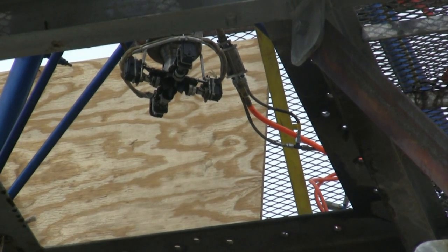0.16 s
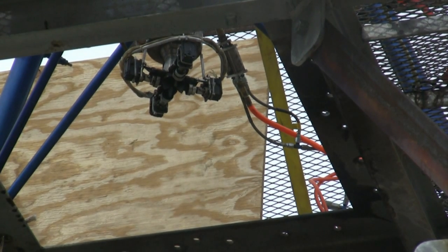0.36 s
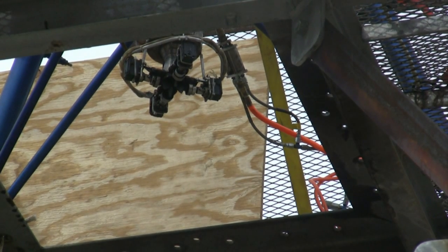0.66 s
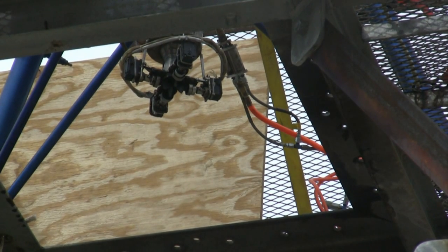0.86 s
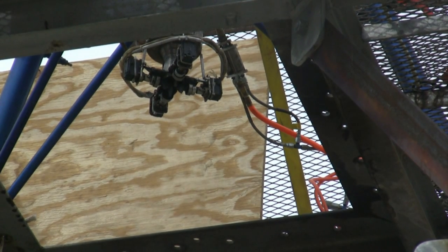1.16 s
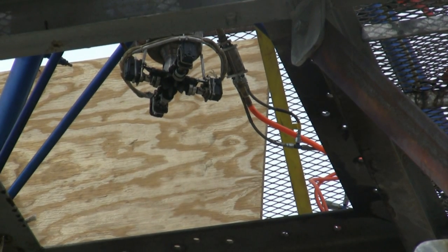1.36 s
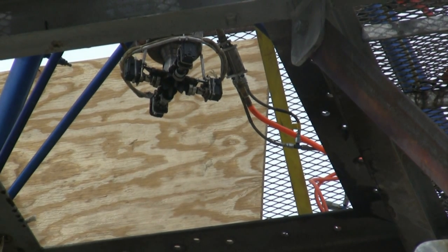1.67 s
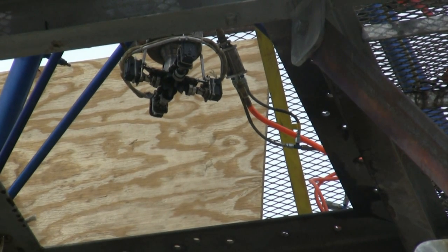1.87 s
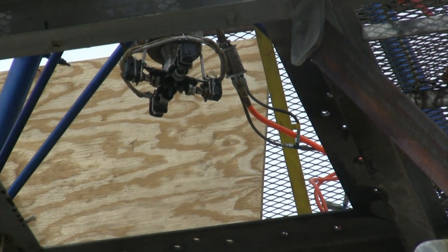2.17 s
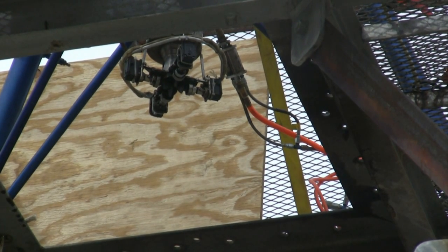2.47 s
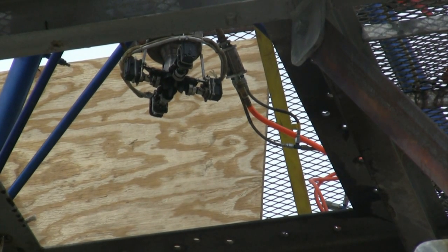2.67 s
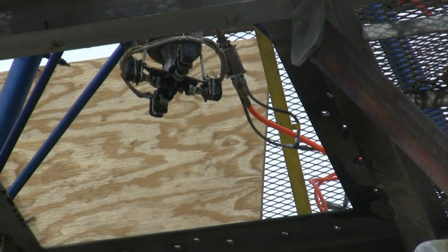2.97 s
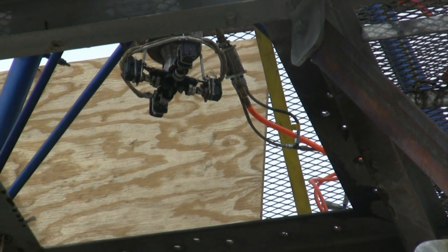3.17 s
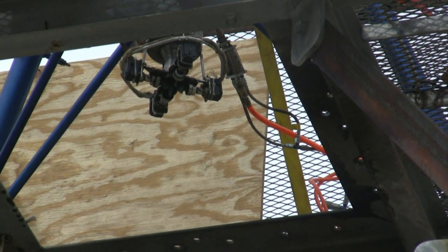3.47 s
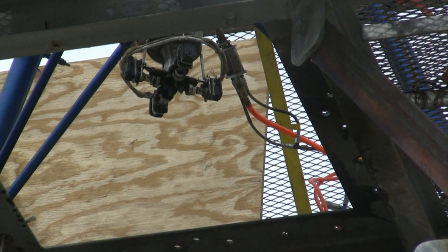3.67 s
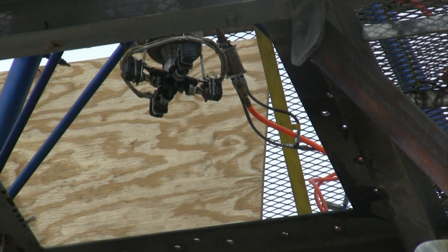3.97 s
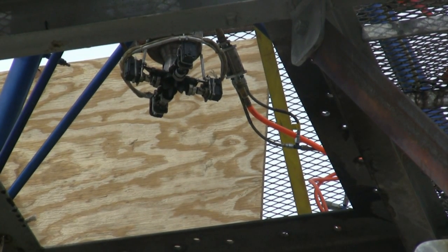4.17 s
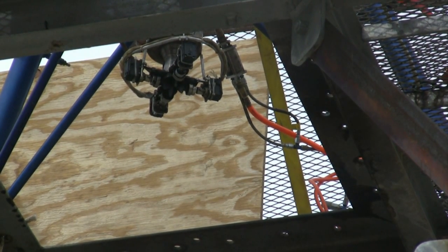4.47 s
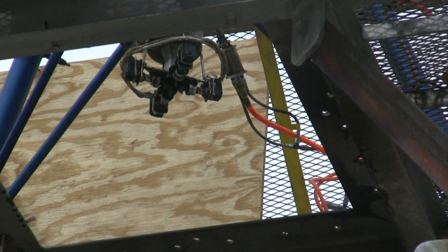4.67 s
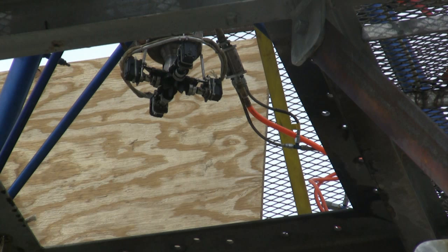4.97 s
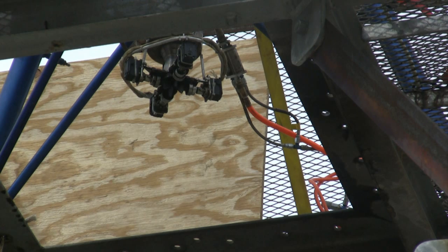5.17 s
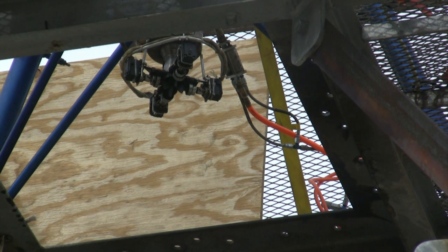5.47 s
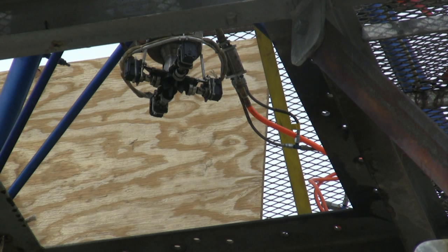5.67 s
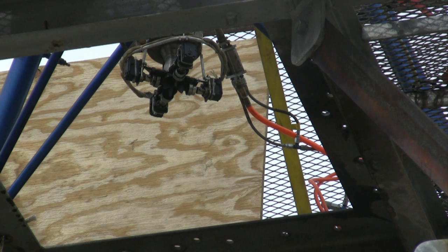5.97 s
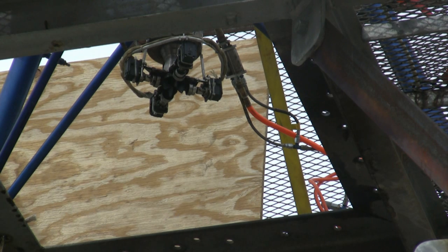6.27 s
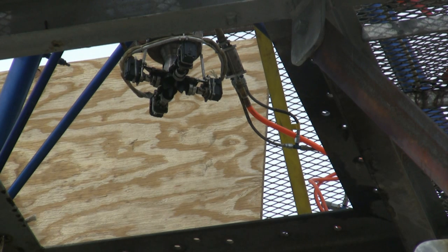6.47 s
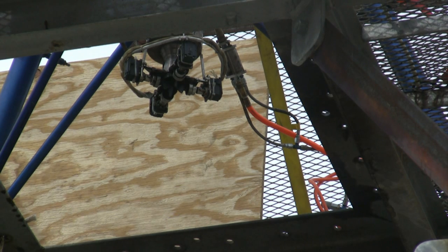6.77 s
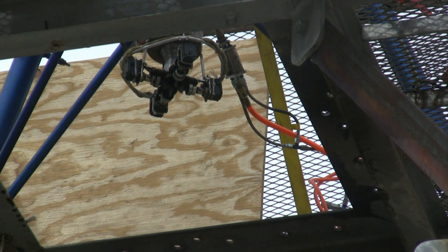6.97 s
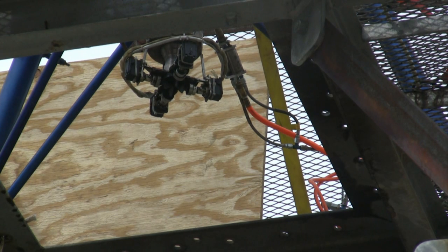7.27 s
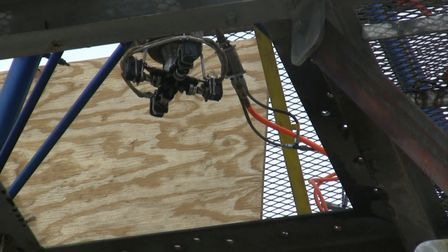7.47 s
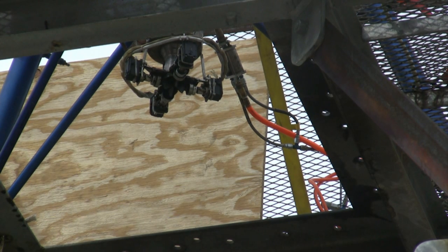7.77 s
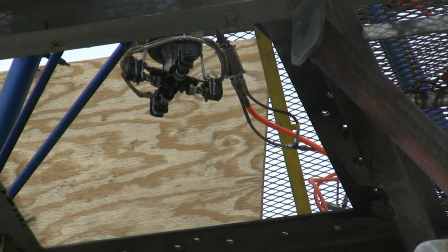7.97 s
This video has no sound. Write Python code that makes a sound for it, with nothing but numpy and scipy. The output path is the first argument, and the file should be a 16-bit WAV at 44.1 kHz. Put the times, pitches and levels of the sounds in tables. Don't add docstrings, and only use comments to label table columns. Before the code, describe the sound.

Close to a small thruster on a steel and plywood stand, a loud broadband exhaust roar overloads the microphone with buffeting wind. It sputters, weakens and shuts off into a brief leaking hiss. In the pause, faint yard noise, hum and wind bumps rise, with a tiny tick. Then a hard pressure thump restarts the jet, with a falling resonant tone and a climbing whistle.

```python
import sys
import numpy as np
from scipy import signal
from scipy.fft import rfft, irfft, next_fast_len
from scipy.io import wavfile
from scipy.ndimage import uniform_filter1d, map_coordinates

SR = 44100
rng = np.random.default_rng(int(sys.argv[2]) if len(sys.argv) > 2 else 0)


def undo_db(level):
    steps = np.asarray(level, float) / 20
    return 10 ** steps


def unload_wav(signal):
    wavfile.write(
        sys.argv[1],
        SR,
        np.round(np.clip(np.atleast_2d(signal).T, -1, 1) * 32767).astype(np.int16),
    )


N = 357648
TIME = np.arange(N) / SR

# start in seconds, end in seconds.
PHASES_S = [
    (0, 2.38),
    (2.38, 3.3),
    (3.3, 5.79),
]
SHUT_S = PHASES_S[-1][1]
# start in seconds, end in seconds, first level in dB.
OPENING = (7.1225, 7.1268, -36)
# time in seconds, level in dB.
PRESSURE = [(0, 0.5), (1.1, 0), (2.25, -.5), (2.5, 1.5), (3.0, 0), (3.5, 0), (4.2, -1.5), (4.9, -5),
            (5.1, -6.5), (5.43, -9), (5.69, -11.5), (5.735, -13), (5.77, -31), (5.79, -37.5), (7.12, 0),
            (7.5, -0.5), (7.75, -0.5), (8.11, -1)]
CHOKE_S = (7.31, 7.7)
RECOVER_DB_PER_S, RECOVERED_S = 21, 6.82
DRIFT_GONE_S = (6.82, 6.9)


def unit(x):
    return x / np.sqrt(np.mean(x ** 2) + 1e-20)


def along(points, hz):
    f, v = np.transpose(points)
    return np.interp(np.log(hz + 1), np.log(f + 1), v)


def colour(points):
    return lambda hz: undo_db(along(points, hz))


def curves(rows):
    s, *cols = np.transpose(rows)
    return np.array([np.interp(TIME, s, c) for c in cols])


def ramp(start, end):
    return np.interp(TIME, [start, end], [0, 1])


def wobble(rate):
    knots = rng.standard_normal(int(N * rate / SR) + 4)
    return map_coordinates(knots, [np.arange(N) * rate / SR])


def swells(rows):
    t = np.arange(0, N + 64, 64) / SR
    total = sum(db * np.exp(-((t - s) / w) ** 2 / 2) for s, db, w in rows)
    return np.interp(TIME, t, total)


def filtered(x, response):
    m = next_fast_len(x.shape[-1] + 8192)
    return irfft(rfft(x, m) * response(np.fft.rfftfreq(m, 1 / SR)), m)[..., :x.shape[-1]]


def ports(hz, aside, spread):
    # frequency in Hz, difference in dB.
    left_db = [(60, -14), (300, -10.5), (1300, -6), (2400, -6), (4400, -4.5), (6300, -3), (7600, -8),
               (8600, -1.5), (9600, -3.5), (10500, 3.5), (12500, 0.5), (15500, -2.5)]
    # frequency in Hz, lead in radians.
    left_lead = [(30, .15), (3200, .3), (5500, .15), (7000, .1), (7900, 1.8), (8600, 1.9), (9600, 1.15),
                 (10800, .95), (12700, .5), (15300, 0)]
    # frequency in Hz, likeness from 0 to 1.
    alike = [(60, .5), (200, .96), (1400, .95), (3100, .95), (4500, .96), (6500, .82), (7600, .25),
             (8600, .62), (9600, .82), (13000, .76), (14300, .8), (15300, .9)]
    turn = np.arccos(np.clip(along(alike, hz), 0, 1) ** spread) / 2
    lean = undo_db(aside * along(left_db, hz) / 2) * np.exp(.5j * along(left_lead, hz))
    left = [lean * np.cos(turn), lean * np.sin(turn)]
    right = [np.cos(turn) / lean, -np.sin(turn) / lean]
    return np.array([left, right])


def rush(response, aside=1, spread=1, span=(0, N / SR)):
    first, last = round(span[0] * SR), min(round(span[1] * SR), N)
    noise = rng.standard_normal((1, 2, last - first))
    pair = filtered(noise, lambda hz: ports(hz, aside, spread) * response(hz)).sum(axis=1)
    pair = pair / np.sqrt(np.mean(pair.mean(axis=0) ** 2))
    return np.pad(pair, ((0, 0), (first, N - last)))


def glide(hz, knots, core=0):
    envelope = core + wobble(knots) + 1j * wobble(knots)
    return np.real(envelope * np.exp(2j * np.pi * np.cumsum(hz) / SR))


def puff(s, hz, width):
    return np.sin(2 * np.pi * hz * (TIME - s)) * np.exp(-((TIME - s) / width) ** 2 / 2)


def background_db():
    open_db, climb_share = [-45.5, -52.5, -45.5, -30], [.75, .4, .9, 1]
    linger_db, linger_end_s, linger_decay_s = [6.5, 14.5, 1.5, 0], 6.07, .07
    swell_s, swell_db = (6.3, 6.55), 11
    duck_db = -17.5
    gain_db = RECOVER_DB_PER_S * np.minimum(TIME - RECOVERED_S, 0) + duck_db * (TIME > OPENING[1])
    levels = np.array(open_db)[:, None] + np.outer(climb_share, gain_db)
    linger = np.outer(linger_db, np.exp(-np.maximum(TIME - linger_end_s, 0) / linger_decay_s))
    return levels + linger + np.outer([0, swell_db, 0, 0], ramp(*swell_s) - 1)


def yard_noise(level_db):
    # frequency in Hz, density in dB per Hz.
    yard_colour = [(60, -28), (130, -4), (250, -7), (380, -2), (460, -6), (550, -1.5), (650, -11),
                   (760, -5), (950, -12), (1150, -7), (1650, -12), (1850, -22), (2600, -27.5), (4000, -61)]
    lull_db = -2 * ramp(*DRIFT_GONE_S)
    return undo_db(level_db + lull_db + 1.6 * wobble(3.7)) * rush(colour(yard_colour), span=(5.3, 7.3))


def far_hiss(level_db):
    # frequency in Hz, density in dB per Hz.
    hiss_colour = [(1180, -40.5), (2000, -14), (2570, -14), (3290, -12.5), (3680, -15), (4370, -5.5),
                   (5470, -4.5), (5960, -7.5), (6380, -5), (6660, -9), (15600, -15)]
    own = unit(filtered(rng.standard_normal((2, N)), colour(hiss_colour)))
    return undo_db(level_db) * (0.86 * rush(colour(hiss_colour), span=(5.3, 7.3)) + 0.71 * own)


def breeze(level_db):
    # frequency in Hz, density in dB per Hz.
    breeze_colour = [(15, -10), (30, -1.5), (90, -3.5), (200, -14), (400, -39.5)]
    noise = unit(filtered(rng.standard_normal((2, N)), colour(breeze_colour)))
    return undo_db(level_db + 3 * wobble(15)) * noise * undo_db([[-6], [0]])


def hum(level_db):
    # frequency in Hz, level in dB.
    mains = [(59.6, -6), (119.2, -17), (178.8, -29), (548, -25), (755, -29), (870, -29)]
    tones = 0
    for hz, db in mains:
        phase = 2 * np.pi * hz * TIME + 0.44 * wobble(9) + hz / 800 * wobble(35)
        tones = tones + undo_db(db + 1.8 * wobble(14)) * np.sin(phase)
    return undo_db(level_db + 1.5 + [[-5], [3]]) * tones


def background():
    yard_db, hiss_db, breeze_db, hum_db = background_db()
    return yard_noise(yard_db) + far_hiss(hiss_db) + breeze(breeze_db) + hum(hum_db)


def bumps():
    # time in seconds, right port level in dB, frequency in Hz, width in seconds.
    wind_bumps = [(2.33, -14, 69.7, 0.011), (2.77, -12, 130, .008), (6.132, -23, 140, 0.0056),
                  (6.185, -39, 110, .006), (6.266, -22, 110, 0.0037), (6.28, -25, 75, 0.0059),
                  (6.293, -30, 99.5, .006), (6.345, -33, 120, .005), (6.38, -31, 110, .005),
                  (6.41, -36, 100, .006), (6.528, -35, 129, .006), (6.985, -5, 110, 0.0038),
                  (6.999, -15, 100, .004), (7.03, -24, 60, .01)]
    return sum(undo_db(db) * puff(s, hz, w) for s, db, hz, w in wind_bumps) * np.array([[-.5], [1]])


def drift():
    # frequency in Hz, density in dB per Hz.
    drift_colour = [(1500, -30), (1900, -0.5), (2600, -2.5), (3300, -2.5), (4000, -6), (5500, -20)]
    # time in seconds, lift in dB, width in seconds.
    last_puff = [(6.09, 8, .035)]
    climb_db = RECOVER_DB_PER_S * np.minimum(TIME - RECOVERED_S, 0)
    level_db = -57.5 + swells(last_puff) + .3 * climb_db - 9 * ramp(*DRIFT_GONE_S)
    return undo_db(level_db) * rush(colour(drift_colour), spread=2.5, span=(5.8, 7.1))


def leak():
    # time in seconds, level in dB.
    leak_db = [
        (5.76, -39),
        (5.776, -38),
        (5.924, -33.5),
        (6.044, -31),
        (6.058, -34.5),
        (6.086, -72.5),
        (6.14, -66.5),
    ]
    # frequency in Hz, density in dB per Hz.
    leak_colour = [(700, -46), (1200, -18), (1600, -7), (2700, -17), (3100, -10), (4200, -5.5),
                   (5000, -8.5), (5900, -24), (7000, -15.5), (10600, -2.5), (12800, -7), (14100, -2),
                   (14800, -7), (15700, -16.5)]

    def response(hz):
        comb = 1 + 0.5 * np.exp(-2j * np.pi * hz * 0.0057) + 0.31 * np.exp(-2j * np.pi * hz * 0.0023)
        return undo_db(along(leak_colour, hz)) * comb

    return undo_db(curves(leak_db)) * rush(response, span=(leak_db[0][0], leak_db[-1][0]))


def relay_tick():
    s, db = (6.838, -35)
    tick = undo_db(db - 60 * np.abs(TIME - s) / .006) * rng.standard_normal(N)
    return tick * undo_db([[-5], [0]])


def opening_push():
    s, db, hz, width = (7.127, 2.2, 270, 0.0013)
    return undo_db(db) * puff(s, hz, width) * undo_db([[-4], [0]])


def feed_line():
    # time in seconds, resonance in Hz, level in dB.
    filling = [
        (7.14, 1650, -27),
        (7.25, 1260, -28),
        (7.33, 1000, -22.5),
        (7.43, 850, -24.5),
        (7.48, 780, -40),
    ]
    hz, db = curves(filling)
    during = (TIME > filling[0][0]) * (TIME < filling[-1][0])
    return during * undo_db(db) * glide(hz, 350)


def screech():
    # time in seconds, frequency in Hz, level in dB.
    shock_cells = [
        (7.35, 2950, -38),
        (7.5, 3100, -27),
        (7.75, 3420, -24),
        (7.95, 3570, -22),
        (8.11, 3660, -19),
    ]
    hz, db = curves(shock_cells)
    whistle = undo_db(db) * glide(hz, 70, core=.7)
    shoulder = undo_db(-21.5) * ramp(*CHOKE_S) * glide(hz + 445, 800)
    return (TIME > shock_cells[0][0]) * (whistle + shoulder)


def blast():
    # frequency in Hz, density in dB per Hz.
    gust = [(30, -21.5), (120, -5), (300, -0.5), (1200, 0), (3000, -4.5), (6000, -19.5)]
    full_db, aside_db, again_db = -7.5, -16, -24.5
    turn_s = (2.3, 2.42)
    sag_db = 4 * np.maximum(TIME - turn_s[1], 0)
    first_db = full_db + (aside_db - full_db) * ramp(*turn_s) - sag_db + 1.3 * curves(PRESSURE)[0]
    second_db = again_db + 4.5 * (TIME - OPENING[1])
    level_db = np.where(TIME > OPENING[1], second_db, np.where(TIME < SHUT_S, first_db, -120))
    noise = filtered(rng.standard_normal((2, N)), colour(gust))
    lumps = undo_db(2.4 * np.array([wobble(20), wobble(20)]))
    return undo_db(level_db) * unit(lumps * noise)


def spurts():
    # start in seconds, strength in dB, length in seconds.
    thin_gas = [(.25, 2.5, 0.28), (0.558, 3, 0.27), (.96, 1, .14), (1.35, 2, .6), (2.198, 3, .11),
                (2.39, 2.5, 0.12), (2.698, 4, .32), (3.15, 3.5, .075), (3.28, 2.5, 0.13), (3.401, 5, .075),
                (3.552, 5, 0.049), (3.675, 5.5, .095), (3.82, 3, .055), (3.94, 1.5, .18),
                (7.233, 3.5, 0.11)]
    edge_s = .012
    t = np.arange(0, N + 64, 64) / SR
    held = 0
    for s, db, length in thin_gas:
        held = held + db * (np.tanh((t - s) / edge_s) - np.tanh((t - s - length) / edge_s)) / 2
    return np.interp(TIME, t, held)


def flow():
    # rumble, roar, shriek and fizz in dB.
    bands_db = [
        (-19, -8.5, -7, -12),
        (-19.5, -7, -8, -14.5),
        (-21.5, -9.5, -9, -15),
        (-29, -12.5, -9, -13),
    ]
    follows = [.8, .95, .97, 1.15]
    spurt_share = [
        (-.6, -.3, -0.088, 1),
        (0.21, -.4, -.1, 0.88),
        (.6, 0.29, .15, 1),
        (-.3, .9, -.3, 0.94),
    ]
    # time in seconds, strength in dB, width in seconds.
    slugs = [(.03, 3, .03), (.66, 0, .08), (.87, -2, .05), (1.15, 4, .12), (2.1, 4, .15), (2.29, 5.5, .04),
             (2.68, 0, .04), (3.9, 3.5, .04), (4.8, 3, .2), (5.1, 2, .05), (5.27, 2.5, .06), (5.69, 2, .03),
             (7.416, 6, .04), (7.87, 10.5, .09)]
    slug_share = [0.92, -0.04, 0.057, -.1]
    surge_db, surge_decay_s = [21, 6.3, 7, 8], [.012, 0.015, .012, .015]
    choke_db = [-6.5, -5.5, 3, 0]

    def col(values):
        return np.array(values)[:, None]

    since = TIME - OPENING[1]
    surge = (since > -.1) * col(surge_db) * np.exp(-np.maximum(since, 0) / col(surge_decay_s))
    common = col(follows) * curves(PRESSURE) + col(slug_share) * swells(slugs)
    common = common + surge + col(choke_db) * ramp(*CHOKE_S)
    lift = spurts()
    return [common + col(base) + col(share) * lift for base, share in zip(bands_db, spurt_share)]


def jet(levels, jet_colour, panels, panel_hz, aside, spread, ring, span):
    edges_hz = [800, 3400, 8800]
    # frequency in Hz, width in Hz, level in dB.
    modes = [(334, 88, -7), (657, 130, -3), (1100, 110, -1), (1470, 260, 0), (2140, 170, -1),
             (2490, 64, -1), (3510, 71, -2), (4240, 120, 0)]

    def above(hz, edge):
        return 1 / (1 + (edge / (hz + 1)) ** 14)

    def comb(hz):
        echoes = sum(gain * np.exp(-2j * np.pi * hz * ms / 1000) for ms, gain in panels)
        return 1 + (1 - above(hz, panel_hz)) * echoes

    def stand(hz):
        return 1 + ring * sum(undo_db(db / 2) * 1j * hz * w / (c * c - hz * hz + 1j * hz * w) for c, w, db in modes)

    edges, sound = [1, *edges_hz, SR], 0
    for low, high, db in zip(edges[:-1], edges[1:], levels):
        def band(hz):
            window = np.sqrt(above(hz, low) - above(hz, high))
            return window * undo_db(along(jet_colour, hz)) * comb(hz) * stand(hz)

        sound = sound + undo_db(db + .5 * wobble(14)) * rush(band, aside, spread, span)
    return sound


def patchy(x, depth_db):
    z = signal.stft(x, nperseg=512)[2]
    field = rng.standard_normal(z.shape[1:])
    field = uniform_filter1d(uniform_filter1d(field, 7, 0), 16, 1)
    return signal.istft(z * undo_db(depth_db * unit(field)), nperseg=512)[1][:, :N]


def burns():
    # frequency in Hz, density in dB per Hz.
    colours = [
        [(18, -42.5), (30, -16), (380, -3.5), (948, -3), (1140, -1), (2080, 0), (3900, 1.5), (4930, 0),
         (7900, -6), (14400, -11), (15600, -11.5)],
        [(18, -48), (30, -20), (197, -10.5), (300, -8), (548, -10), (641, -4), (877, -3.5), (1480, -0.5),
         (3080, -4), (4560, -2.5), (8320, -10.5), (11400, -10.5), (15600, -15.5)],
        [(30, -28.5), (200, -14), (340, -5.5), (570, -9.5), (625, -0.5), (720, -4), (870, -5), (1080, -1.5),
         (1970, -4), (3000, -2.5), (4500, 0.5), (8000, -14), (9800, -17), (15700, -21.5)],
        [(30, -33), (290, -18.5), (900, -14.5), (2300, -14), (3300, -9.5), (3800, -4), (4400, 2), (5600, -2),
         (6500, -3.5), (7200, -10.5), (8600, -14), (11000, -14.5), (15700, -19.5)],
    ]
    # delay in ms, gain.
    panels = [
        [(2.75, 0.054), (3.2, 0.031)],
        [(2.83, .15), (3.3, 0.054), (5.6, .06)],
        [(2.86, 0.24), (3.31, 0.091), (1.2, 0.033), (4.1, 0.09), (5.7, 0.03)],
        [(3.23, 0.24), (3.8, 0.13), (4.5, 0.16), (1.4, 0.043)],
    ]
    panel_hz = [6000, 4500, 5800, 7010]
    aside = [.3, .6, 1.05, .6]
    spread = [3, 1.8, 1.25, 1.3]
    stand_ring = [0.042, .15, .25, .05]
    start, end, first_db = OPENING
    spans = PHASES_S + [(start - .02, N / SR)]
    phases = zip(flow(), colours, panels, panel_hz, aside, spread, stand_ring, spans)
    sound = sum(jet(*phase) for phase in phases)
    gate_s = [SHUT_S, SHUT_S + .01, start - .001, start, end]
    gate_db = np.interp(TIME, gate_s, [0, -90, -90, first_db, 0])
    return patchy(sound, depth_db=.6) * undo_db(gate_db)


def scene():
    surroundings = background() + bumps() + drift()
    valve = leak() + relay_tick() + opening_push()
    return surroundings + valve + feed_line() + screech() + blast() + burns()


def top_cut(x):
    return signal.sosfilt(signal.butter(12, 15740, fs=SR, output="sos"), x)


def record(dry):
    ceiling, hardness = np.array([[.82], [.78]]), 5
    bass_hz, top_hz = 25, 15900
    flat = dry / (1 + np.abs(dry / ceiling) ** hardness) ** (1 / hardness)
    mix = filtered(flat, lambda hz: (hz < top_hz) * 1j * hz / (bass_hz + 1j * hz))
    return top_cut(mix)


dry = scene()
out = record(dry)
unload_wav(out)
```